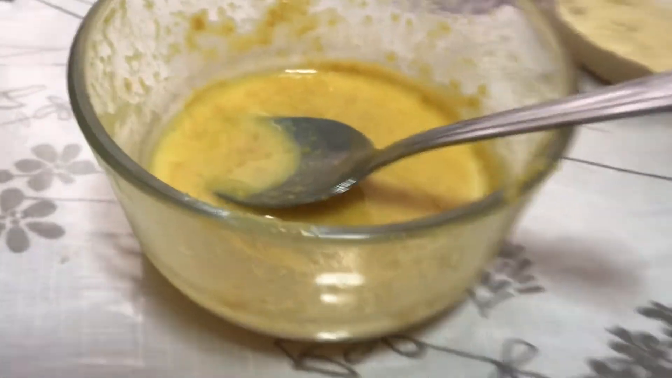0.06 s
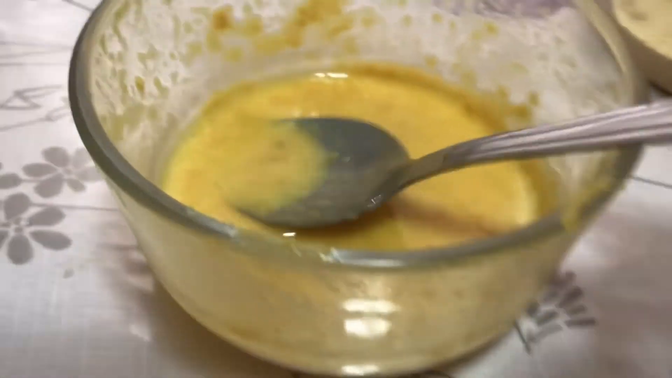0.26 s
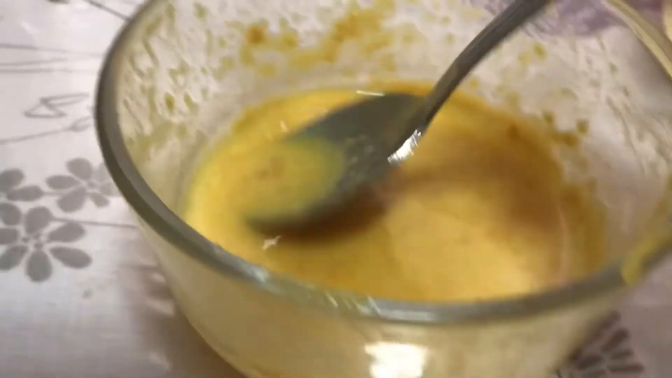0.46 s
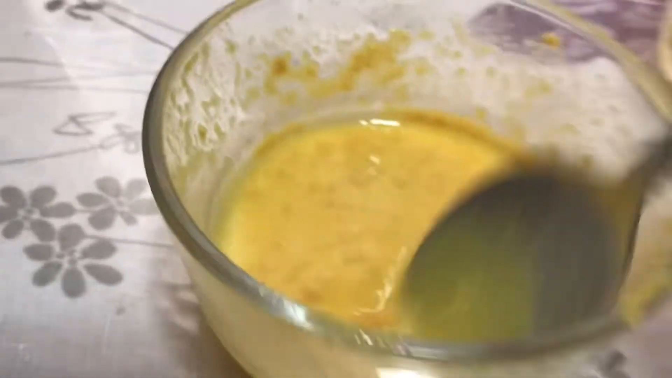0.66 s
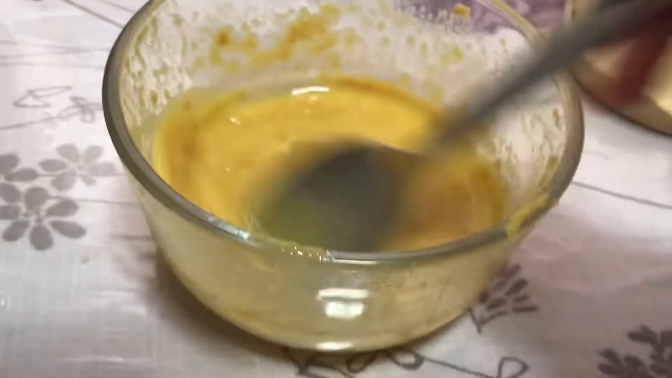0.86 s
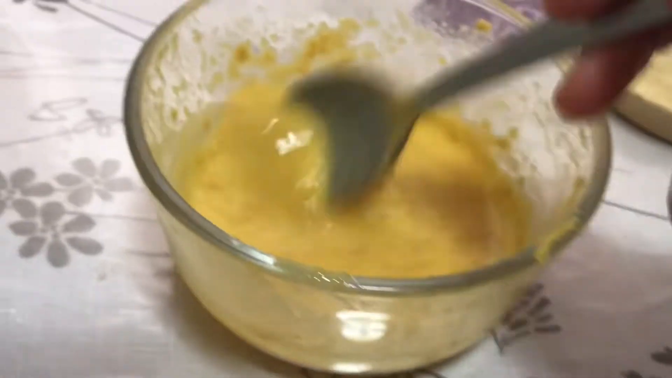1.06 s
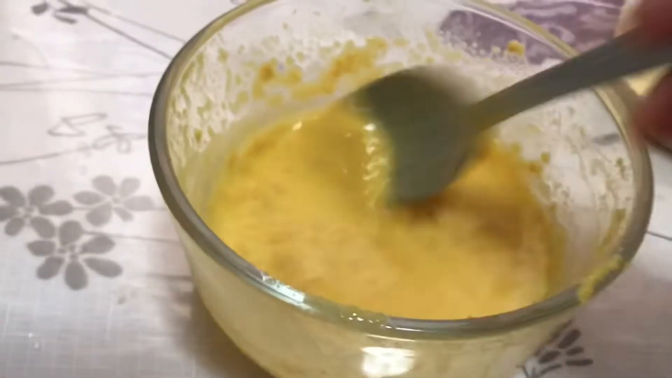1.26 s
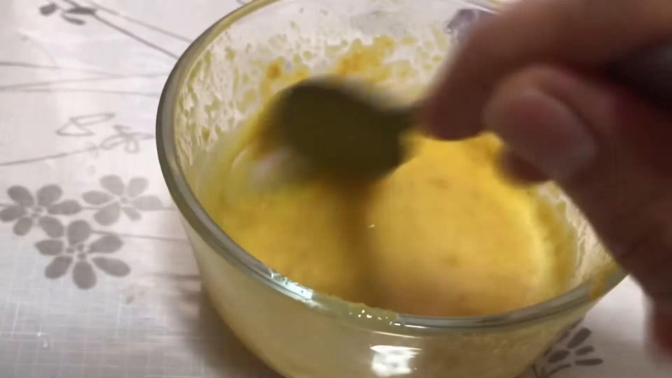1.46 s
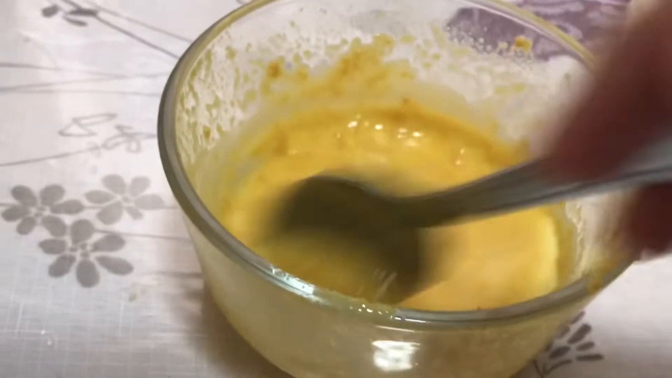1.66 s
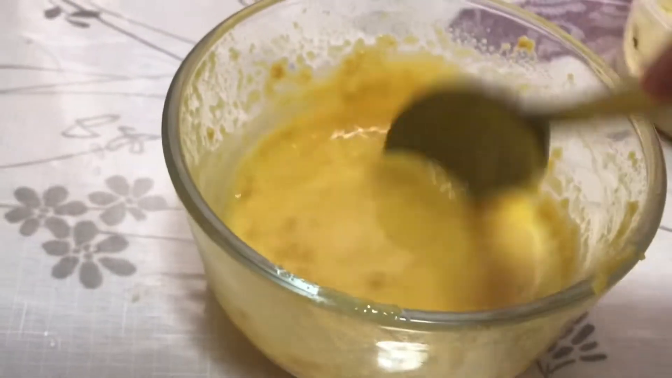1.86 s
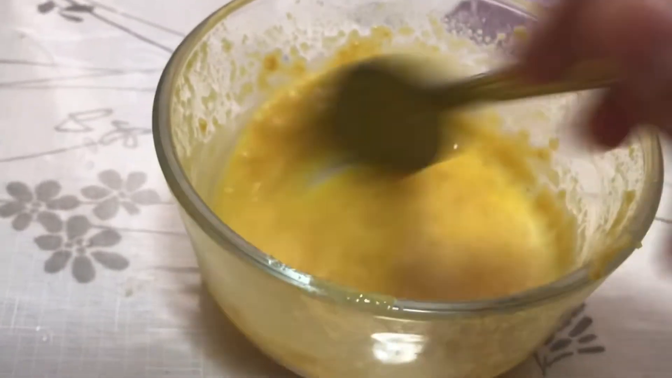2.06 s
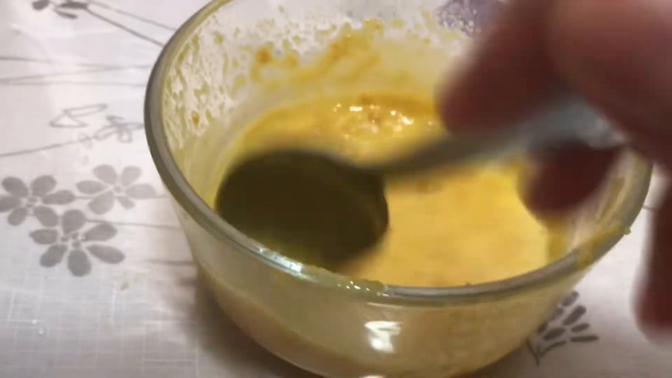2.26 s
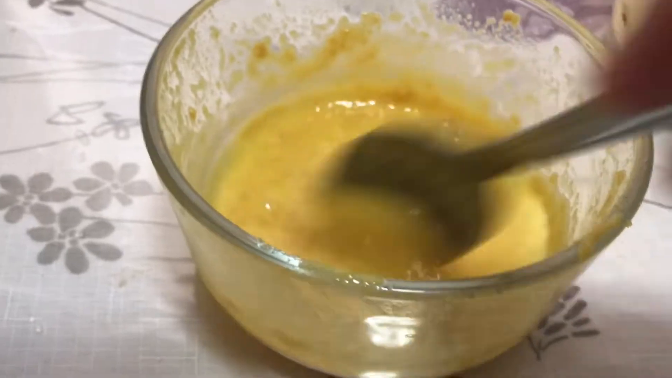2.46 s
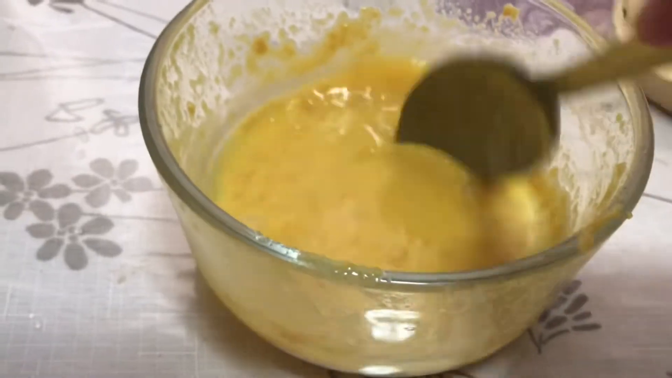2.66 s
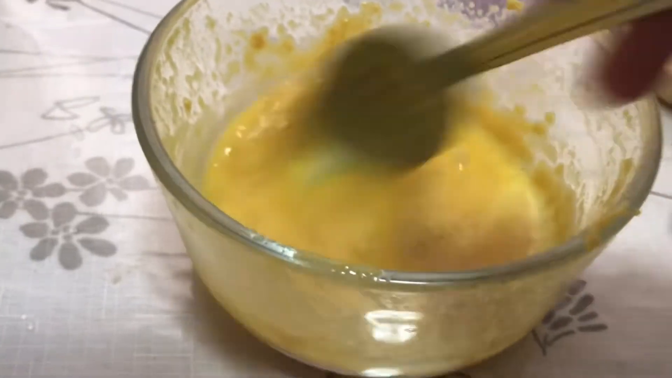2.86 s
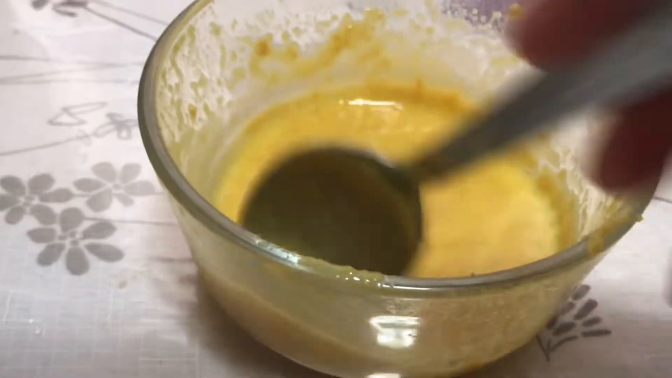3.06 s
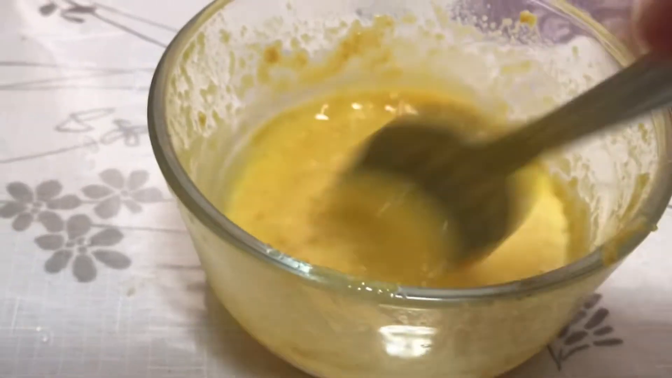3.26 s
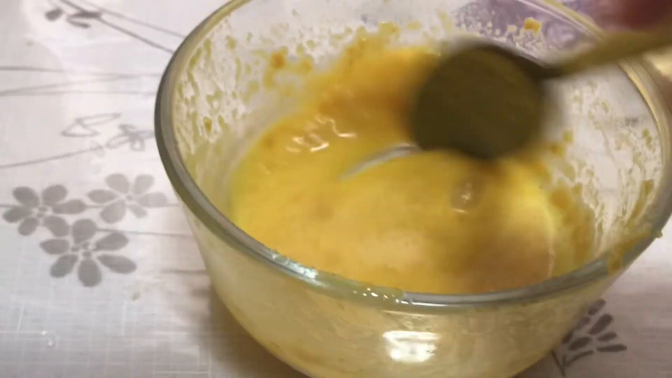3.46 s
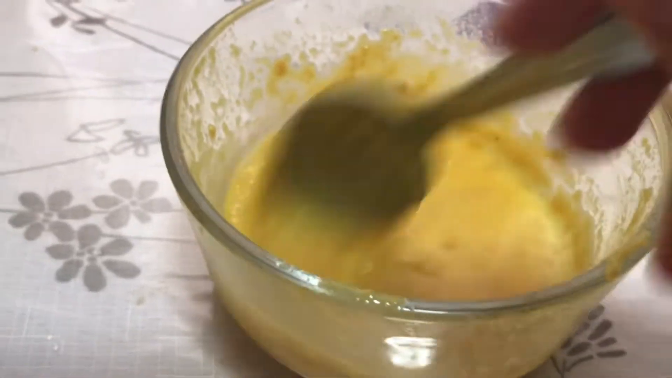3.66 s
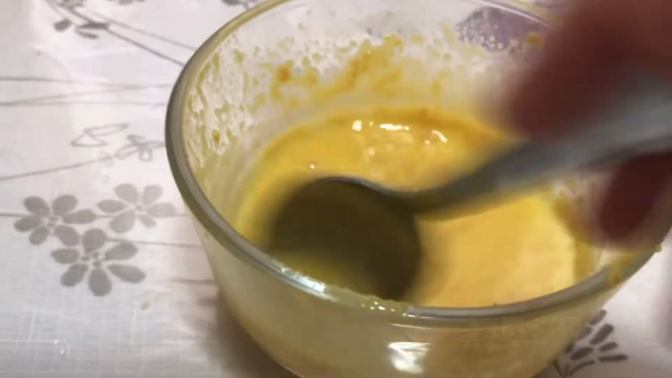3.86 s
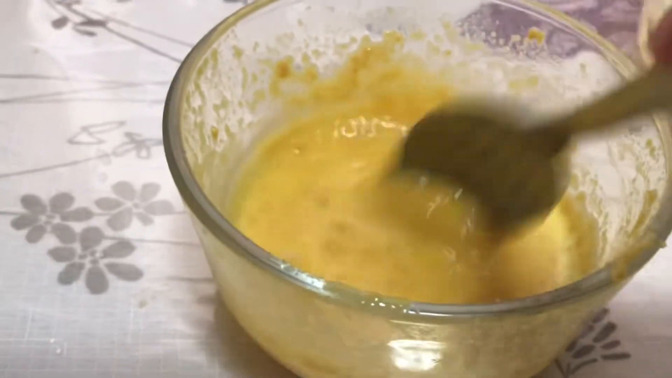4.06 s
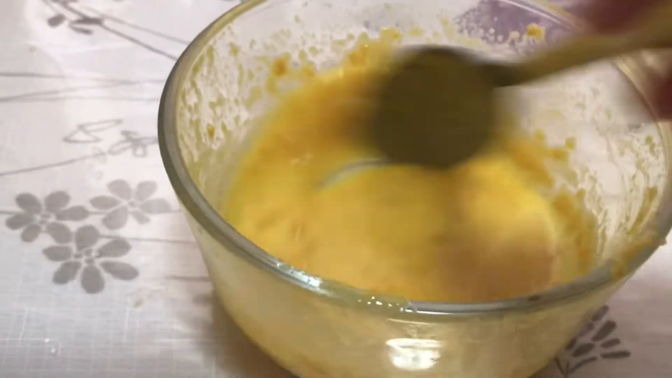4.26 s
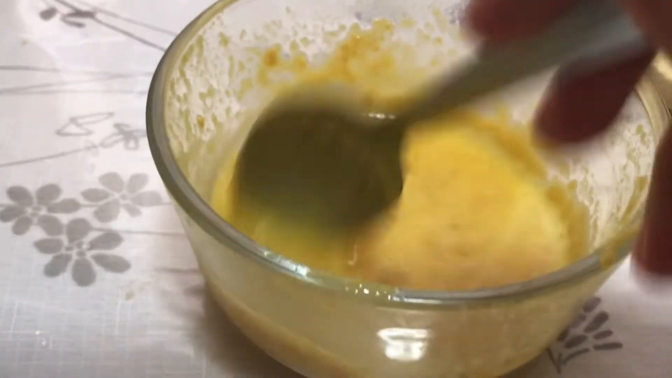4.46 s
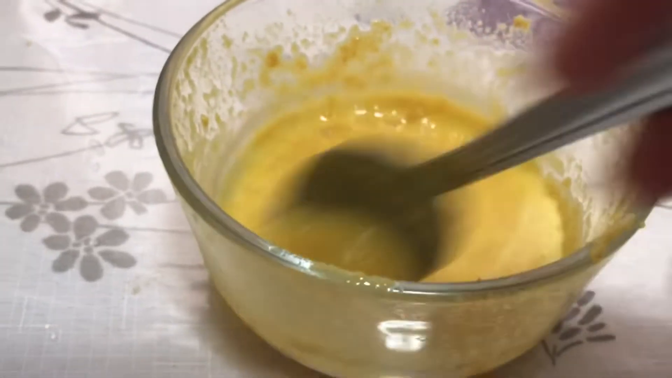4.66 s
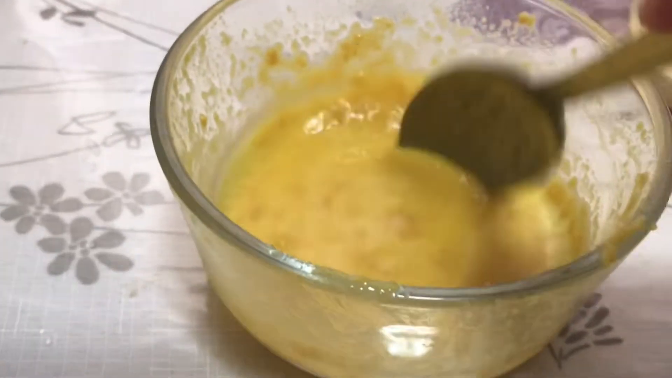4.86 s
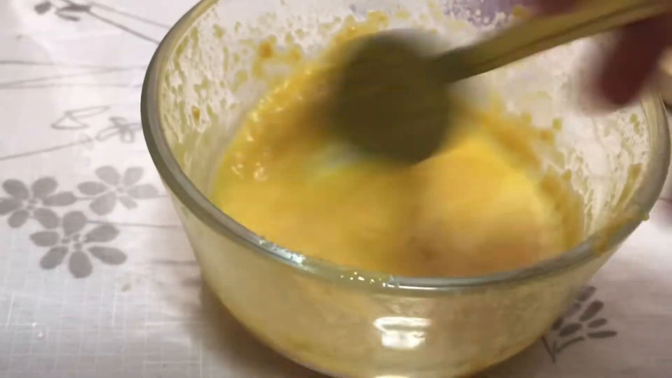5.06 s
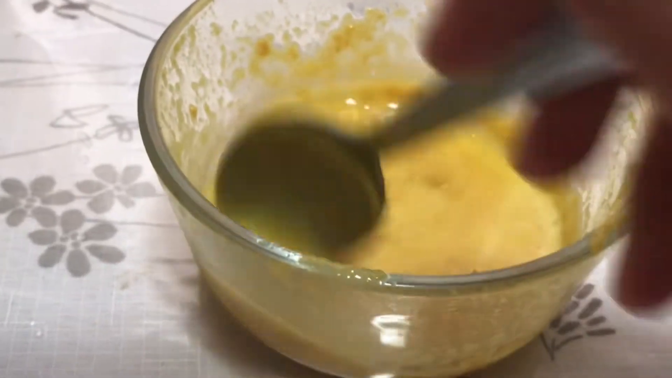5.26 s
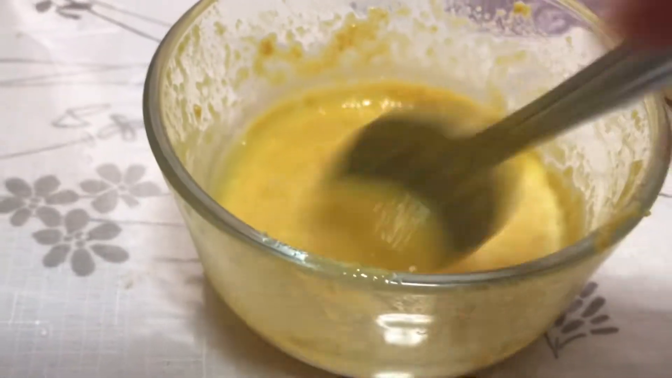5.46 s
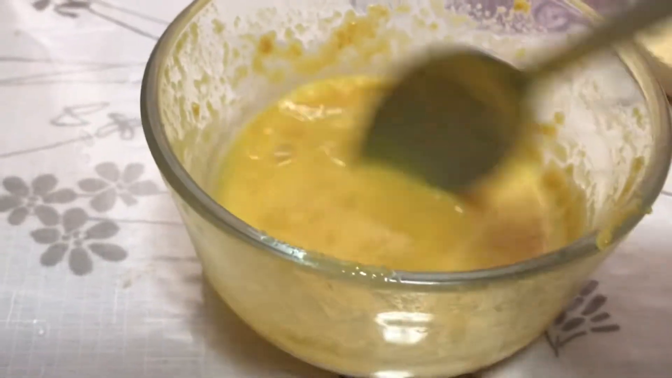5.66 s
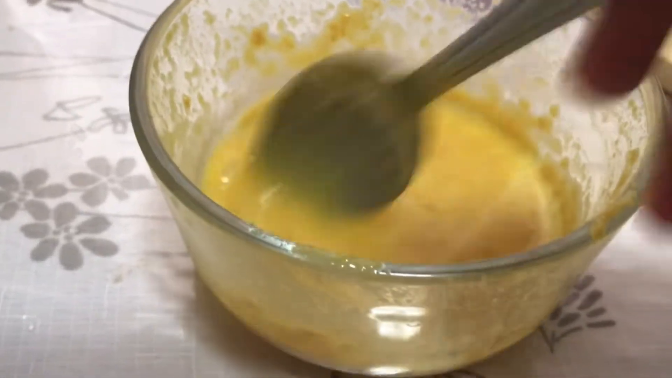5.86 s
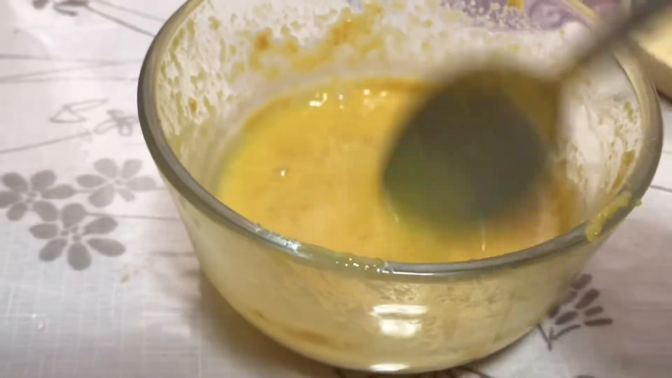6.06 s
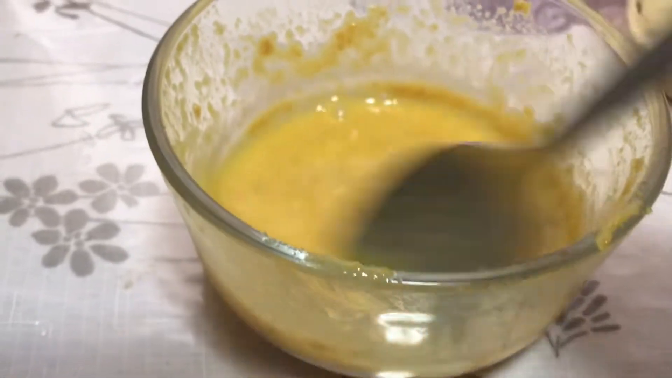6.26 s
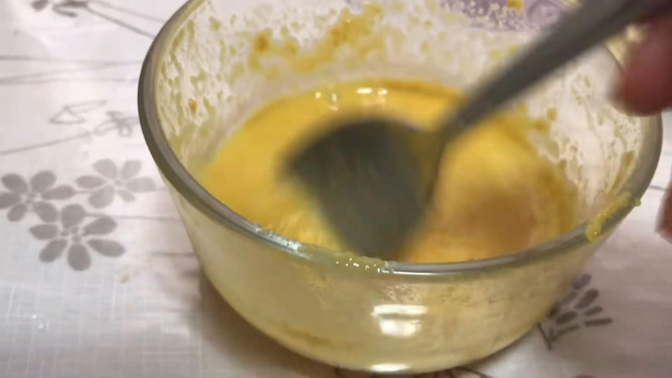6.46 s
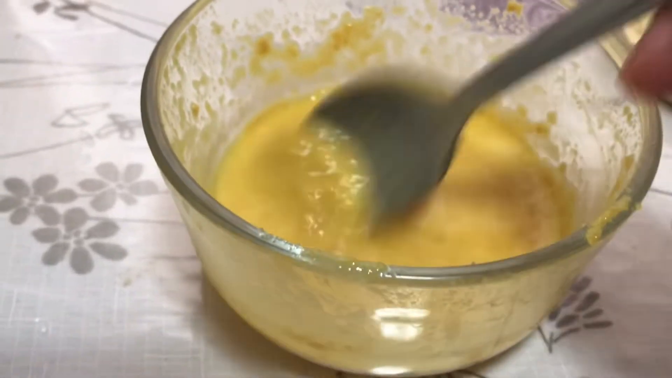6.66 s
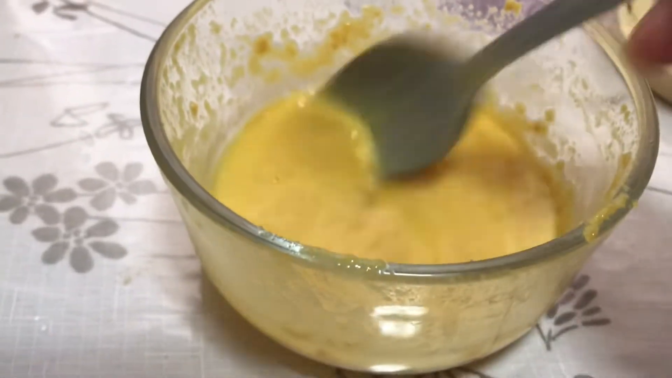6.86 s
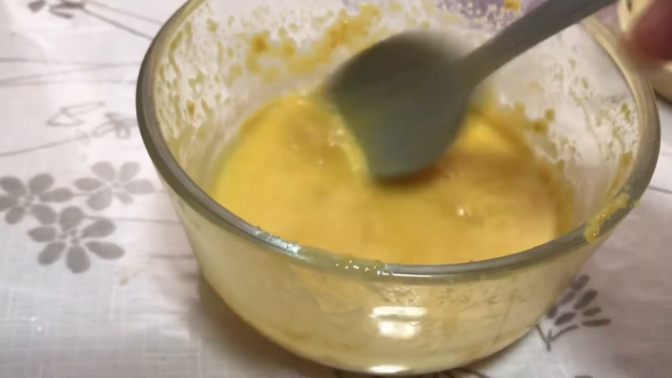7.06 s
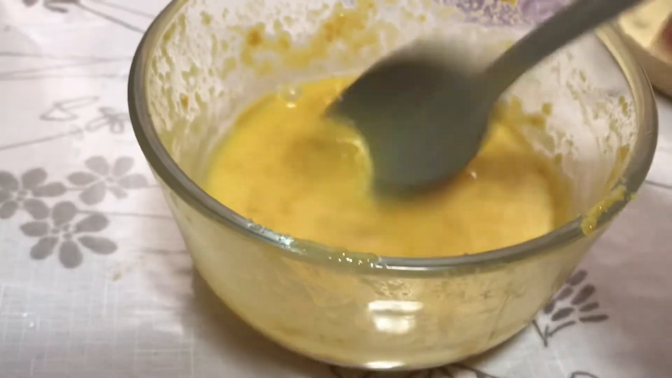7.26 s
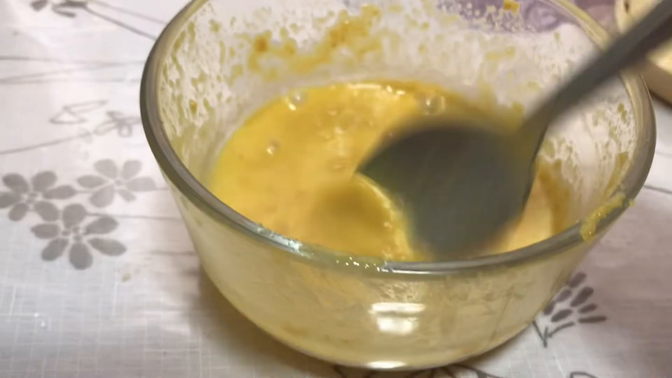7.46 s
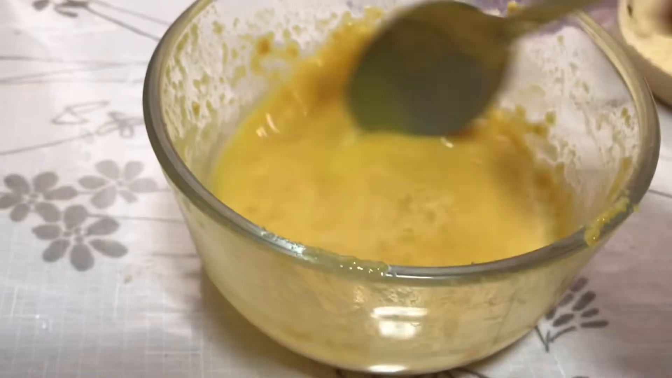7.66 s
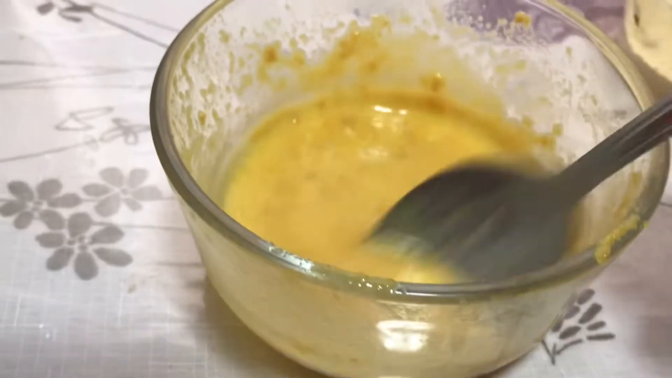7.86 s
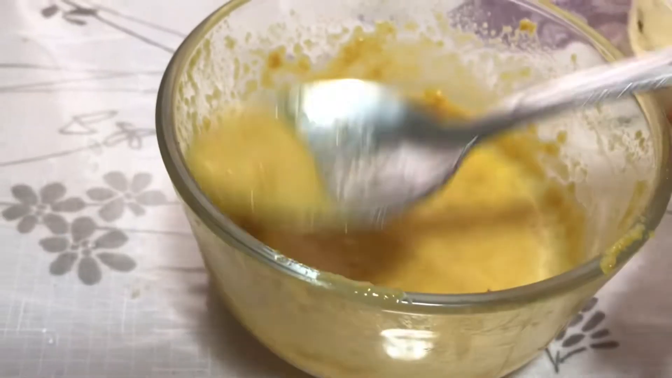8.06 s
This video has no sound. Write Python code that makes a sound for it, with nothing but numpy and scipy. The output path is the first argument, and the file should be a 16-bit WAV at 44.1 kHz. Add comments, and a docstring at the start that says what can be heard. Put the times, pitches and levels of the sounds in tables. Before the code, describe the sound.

Close up, a steel spoon clatters against a glass bowl, then scrapes round and round through wet paste with quick knocks and soft plops.

```python
"""A breath of low room rumble, then a steel spoon stirs wet paste fast in a small glass bowl, close up.
The edge grates over the glass as clumped noise driving resonances that swell and bend with each stroke.
It knocks the wall in short rattles of noise, ticks brightly and now and then rings the free rim in sines.
Paste pockets pop as gliding sines with a noisy slop; the cloth-covered table thuds in low resonances.
Faint hiss and a short kitchen reverb lie behind."""
import sys
import numpy as np
from scipy import signal
from scipy.fft import rfft, irfft, next_fast_len
from scipy.io import wavfile
from scipy.ndimage import map_coordinates

SR = 44100
rng = np.random.default_rng(int(sys.argv[2]) if len(sys.argv) > 2 else 0)


def bounce(signal):
    """Save signal as a 16-bit WAV file at the path given by the first command-line argument."""
    frames = np.transpose(np.atleast_2d(signal))
    limited = np.clip(frames, -1, 1)
    pcm = np.round(limited * 32767).astype(np.int16)
    wavfile.write(sys.argv[1], SR, pcm)


N = 357764  # length in samples


def amp(db):
    """Gain from dB."""
    return 10 ** (np.asarray(db) / 20)


def unit(x):
    """x at an RMS of 1."""
    return x / np.sqrt(np.mean(x ** 2) + 1e-20)


def along(points, hz):
    """Values of (f/Hz, value) points, joined on a log frequency axis."""
    f, values = np.transpose(points)
    return np.interp(np.log(hz + 1), np.log(f + 1), values)


def filtered(x, response):
    """x times a complex response of frequency."""
    size = next_fast_len(len(x) + 4096)
    return irfft(rfft(x, size) * response(np.fft.rfftfreq(size, 1 / SR)), size)[:len(x)]


def resonance(f, centre, width):
    """Response of one damped mode, 1 at its centre."""
    return 1j * f * width / (centre ** 2 - f ** 2 + 1j * f * width)


def resonant(x, modes, detune=1, damping=1):
    """x through modes with steep skirts; detune scales their pitches, damping their widths."""
    shifts = np.broadcast_to(detune, len(modes))

    def response(f):
        total = 0
        for (centre, width, db), shift in zip(modes, shifts):
            narrow = resonance(f, centre * shift, width * damping)
            wide = resonance(f, centre * shift, 4 * width * damping)
            total = total + amp(db) * narrow * wide
        return total

    return filtered(x, response)


def wobble(rate, size=N):
    """A smooth random curve, rate knots a second."""
    knots = rng.standard_normal(int(size * rate / SR) + 4)
    return map_coordinates(knots, [np.arange(size) * rate / SR])


def add(out, s, sound):
    """Mix a sound in at a time in seconds."""
    part = out[round(s * SR):][:len(sound)]
    part += sound[:len(part)]


# where the spoon works: t/s, wall modes over pressure at the usual pressure level/dB,
# grit over pressure level/dB, depth (0 up on the bare wall, 1 deep in the paste)
SPOON_PLACE = [(0.201, 37, 15, 0.17), (.5, 23.5, 5, 0.25), (.6, 2, 5, 0.14), (.8, -22, -4, 0.16),
               (0.999, -9.5, -4, 0.43), (1.3, 7, 1.5, 0.49), (1.5, -19, -4, 0.88), (5.3, -15, -7.5, 0.93),
               (5.6, -1.5, 3, 0.61), (5.901, 5, -1.5, 0.3), (6.3, 3, 3, 0.054), (7.1, -1, 5, 0.12),
               (7.899, 3.5, 1.5, 0.31)]


def place(s):
    """The spoon's path through the bowl: wall level, grit level and depth at a time."""
    times, *columns = np.transpose(SPOON_PLACE)
    return [np.interp(s, times, column) for column in columns]


# strokes of the edge over the glass, each until the next: start t/s, pressure level/dB, bite level/dB
EDGE_STROKES = [(0.198, -71, -10), (0.275, -62.5, -13), (0.391, -62.5, -13), (0.436, -58.5, -4),
                (0.561, -37.5, -15.5), (0.678, -45, -3), (0.784, -42.5, -12), (0.847, -44.5, -2.5),
                (0.993, -42, -19), (1.075, -42, 0.5), (1.136, -49.5, 4), (1.222, -45.5, -17),
                (1.289, -47.5, -16), (1.439, -34, -6.5), (1.648, -35.5, -11.5), (1.738, -34, -3),
                (1.914, -39.5, -8), (2.014, -33, -5), (2.189, -36, -7.5), (2.292, -35, -6.5),
                (2.44, -33.5, -6.5), (2.561, -35, -4), (2.711, -35.5, -8), (2.829, -35.5, -1),
                (2.984, -36, -3.5), (3.105, -34, -2.5), (3.262, -37.5, -8), (3.376, -34, -4),
                (3.538, -35.5, -7.5), (3.658, -32.5, -4.5), (3.815, -39, -13), (3.917, -35, -1.5),
                (4.098, -38.5, -14.5), (4.186, -33.5, -2), (4.354, -39, -6.5), (4.47, -35, 0.5),
                (4.635, -37, -8.5), (4.743, -36, -2), (4.908, -38.5, -7), (5.018, -35.5, -1.5),
                (5.192, -38.5, -13), (5.298, -37.5, 0), (5.471, -40.5, -15), (5.574, -44.5, 6.5),
                (5.722, -46.5, -14.5), (5.924, -44, -9.5), (6.167, -42.5, -10), (6.289, -48, -7.5),
                (6.395, -43.5, -5), (6.524, -47.5, -1.5), (6.622, -49.5, -17), (6.687, -47.5, -5),
                (6.855, -40, -7), (6.96, -49.5, -2), (7.044, -41, -6), (7.148, -44.5, 4),
                (7.239, -41.5, -3), (7.324, -43.5, 2), (7.433, -47.5, -14.5), (7.502, -48.5, -6),
                (7.623, -43, -15.5), (7.82, -50.5, -40)]
# resonances, also rung by the knocks, all f/Hz, width before damping/Hz, level/dB:
# glass wall under paste, air in the bowl, spoon, upper modes of the edge
WALL_MODES = [(1250, 100, 0), (1560, 280, -10), (3200, 170, -7)]
AIR_MODES = [(2240, 240, 0)]
SPOON_MODES = [(3000, 260, -4), (3930, 170, 2), (4600, 240, -4), (5400, 240, -5)]
EDGE_MODES = [(5910, 1100, 4), (6785, 1860, 8), (9010, 1730, 6), (11550, 2000, 5), (16000, 470, -48)]
LIFT_S = 7.96  # the last stroke ends
USUAL_DB, WALL_GROWS = -46, 1  # wall modes gain this many extra dB per dB of pressure over the usual
GRIT_BITE, DEEP_WALL_BITE = .55, .36  # share of the bite heard in the grit; in the wall at full depth
HARD_DB = -7  # more bite than this, deep in the paste, marks a hard push
FASTEST_PUSH, FASTEST_RETURN = .5, .47  # where in the stroke the spoon is fastest
TURN_SPEED = .22  # least speed in the level curve, share of the fastest
DEEP_WALL_RISE, DEEP_AIR_RISE = .13, .01  # pitch rise at full depth: lowest wall mode; air unless pushed
# each path: modes, swell power, pitch glide on the bare wall, glide deep in the paste
SCRAPE_PATHS = [(WALL_MODES, 1.3, .06, .06), (AIR_MODES, 1.9, .14, .27),
                (SPOON_MODES, 2.4, .12, .24), (EDGE_MODES, 2.4, .04, .08)]


def scrape():
    """Clumped stick-slip grit drives the bowl's resonances; each stroke swells, fades and bends them."""
    out = np.zeros(N)
    shared_db = 2 * wobble(110) + 4 * wobble(800)
    clumps = [amp(shared_db + 3.8 * wobble(40) + 3 * wobble(150)) for _ in SCRAPE_PATHS]
    # single grains catching under the edge, about 300 a second
    snags = [9 * (rng.random(N) < 300 / SR) * rng.standard_normal(N) for _ in SCRAPE_PATHS]
    ends = [row[0] for row in EDGE_STROKES[1:]] + [LIFT_S]
    for (s, pressure_db, bite_db), end in zip(EDGE_STROKES, ends):
        wall_db, grit_db, depth = place((s + end) / 2)
        wall_db = wall_db + WALL_GROWS * (pressure_db - USUAL_DB) + DEEP_WALL_BITE * depth * bite_db
        grit_db = grit_db + GRIT_BITE * bite_db
        levels_db = pressure_db + np.array([wall_db, 0, bite_db, grit_db])

        first, last = round((s - .015) * SR), round((end + .01268) * SR)  # strokes overlap at the turns
        u = np.linspace(0, 1, last - first)  # progress through the stroke
        hard = bite_db > HARD_DB and depth > .5
        fastest = FASTEST_PUSH if hard else FASTEST_RETURN
        warp = np.log(.5) / np.log(np.clip(fastest, .1, .9))
        speed = np.abs(np.sin(np.pi * u ** warp))
        # a hard push through paste lowers the pitches mid-stroke; any other stroke slides them upward
        bend = .598 * (.5 - speed ** 2) if hard else u - .5
        wall_pitch = 1 + DEEP_WALL_RISE * depth * np.array([1, 0, 0])
        air_pitch = 1 + DEEP_AIR_RISE * depth * (not hard)
        pitches = [wall_pitch, air_pitch, 1, 1]

        for path, clump, snag, db, pitch in zip(SCRAPE_PATHS, clumps, snags, levels_db, pitches):
            modes, swell, bare, deep = path
            grit = clump[first:last] * rng.standard_normal(len(u)) + snag[first:last]
            # each stroke meets the modes unevenly
            met = [(hz, width, level + rng.normal(0, 3)) for hz, width, level in modes]
            body = resonant(grit, met, pitch + .03 * rng.standard_normal(len(modes)))
            glide = bare + (deep - bare) * depth
            read = np.cumsum(1 + glide * (bend - bend.mean()))  # reading faster raises every pitch
            bent = unit(map_coordinates(body, [read], mode="mirror"))
            envelope = np.minimum(20 * speed, 1) * np.maximum(speed, TURN_SPEED) ** swell
            add(out, first / SR, amp(db) * envelope * bent)
    return out


# spoon against glass, damped by paste: t/s, strength level/dB,
# slant (0 square, 1 skidding), crack over strength level/dB
SPOON_KNOCKS = [(0.2827, -18, 0.95, 1.5), (0.2994, -22.5, 0.88, -6), (.411, -36, 0.69, -11),
                (0.4563, -11.5, 0.66, -1), (0.5566, -4.5, 0.76, 2), (0.598, -9.5, 0.18, -3.5),
                (0.6045, -18, 0.0086, -12.5), (0.696, -6.5, 0.71, -8), (0.8008, -13.5, 1, 9),
                (0.8605, -15.5, 0.73, -7.5), (0.8659, -3.5, 0.53, -4.5), (0.88, -25, 0.73, -1),
                (1.053, -33.5, 0.85, -3), (1.093, -22, 0.67, -11.5), (1.106, -17.5, 0.69, -9.5),
                (1.114, -21, 0.016, -2), (1.246, -27, 0.6, -12.5), (1.305, -26.5, 0.58, -17),
                (1.549, -13, 1, -13.5), (1.5842, -5, 0.04, -13.5), (1.608, -9, 0.44, -6),
                (1.81, -24, 0.9, -2), (1.818, -18.5, 0.83, -32), (1.829, -13.5, 0.72, -3.5),
                (1.8746, -12.5, 0, -8), (2.106, -10, 0.76, -19), (2.1447, -13, 0, -8.5),
                (2.1524, -12.5, 0.59, -15), (2.177, -24.5, 0.042, -14), (2.2688, -17.5, 0.21, 1.5),
                (2.377, -16.5, 0.77, -11), (2.4143, -13, 0.49, -33), (2.5401, -11, 0, -7),
                (2.64, -17, 0.75, -36), (2.691, -14, 0.061, -10.5), (2.8094, -16.5, 0.028, -4.5),
                (2.9522, -13, 0.22, 0), (3.0848, -17, 0.27, -6), (3.18, -23.5, 0.99, -2.5),
                (3.226, -15.5, 0.25, -9.5), (3.468, -14.5, 0.8, -6), (3.506, -11.5, 0.048, -7.5),
                (3.627, -17, 0, -7.5), (3.73, -16.5, 0.88, -7.5), (3.7741, -2, 0, -34),
                (3.796, -17, 0.42, -8.5), (4.005, -20, 0.77, -8.5), (4.043, -12.5, 0.55, -7.5),
                (4.0504, -11.5, 0.62, -14.5), (4.2712, -13.5, 0.97, -1.5), (4.3156, -16.5, 0.0044, -11),
                (4.5202, -24, 0.34, 5.5), (4.548, -15, 0.84, -10), (4.597, -12.5, 0, -8.5),
                (4.8292, -15.5, 0.85, -10), (4.8791, -7.5, 0, -5), (5.1556, -10, 0.032, -10.5),
                (5.103, -24, 0.87, -14.5), (5.208, -26, 0.4, -14), (5.3733, -19.5, 0.97, -7.5),
                (5.421, -10.5, 0.14, -6), (5.675, -34.5, 0.59, 5), (6.075, -14.5, 0.89, -0.5),
                (6.0912, -22.5, 0.35, -23), (6.266, -29.5, 0, -21), (6.7086, -10, 0.35, -6),
                (6.74, -20, 0.19, -5), (6.895, -25.5, 0.45, -9), (7.093, -28, 0.57, -15),
                (7.155, -13, 0.39, -14), (7.183, -20.5, 0.88, 6), (7.1907, -33, 0.94, -6),
                (7.237, -38, 0.48, -4), (7.29, -25.5, 0.54, -2), (7.352, -15.5, 0.67, -3),
                (7.413, -41, 0.95, 1), (7.5282, -25, 0.96, 3), (7.5397, -6, 0, -1), (7.556, -17, 0.78, -1),
                (7.705, -30.5, .4, -15), (7.8401, -20.5, 0.52, -20), (7.907, -31, 0.097, -20)]
KNOCK_SPOON_DB, KNOCK_SPOON_SLANT_DB = -19.5, 26  # spoon over strength, square; what a full skid adds
KNOCK_WALL_DB, KNOCK_WALL_GROWS = -3, .82  # wall at strength 0 before slant and place; dB per dB
KNOCK_WALL_SLANT_DB = -3.5  # wall change for a full skid
KNOCK_WALL_PLACE = .27  # share of the place's wall level heard in a knock
CRACK_DB = 7.5  # edge modes over strength for a crack of 0 dB
SKID_BUILD_S = .02  # a full skid swells 60 dB over about this time before its peak


def knocks():
    """Each contact is a short rattle of force into the damped modes of wall, air, spoon and edge."""
    out, lead = np.zeros(N), SR // 100
    t = (np.arange(SR // 16) - lead) / SR
    for s, db, slant, crack_db in SPOON_KNOCKS:
        place_wall_db, _, depth = place(s)
        spoon_db = db + KNOCK_SPOON_DB + KNOCK_SPOON_SLANT_DB * slant
        wall_db = KNOCK_WALL_DB + KNOCK_WALL_GROWS * db + KNOCK_WALL_SLANT_DB * slant
        wall_db = wall_db + KNOCK_WALL_PLACE * place_wall_db
        # near 1 where the spoon outweighs the air and the crack
        glancing = 1 / (1 + amp(max(db - 3, db + crack_db + 7) - spoon_db) ** 4)
        build_s = .0003 + SKID_BUILD_S * glancing ** 2  # a skid builds and lasts longer
        fade_s = .013 + .013 * glancing
        force = amp(60 * np.minimum(t / build_s, -t / fade_s)) * rng.standard_normal(len(t))
        force[lead] += 7 * (1 - glancing)
        paths = [(AIR_MODES, db, .73 + .97 * depth), (WALL_MODES, wall_db, 2.2),
                 (SPOON_MODES, spoon_db, 1.1), (EDGE_MODES, db + crack_db + CRACK_DB, 1.2)]
        for modes, level_db, damping in paths:
            detune = 1 + .024 * rng.standard_normal(len(modes))
            ring = resonant(force, modes, detune, damping)
            add(out, s - lead / SR, amp(level_db) * ring / np.abs(ring).max())
    return out


# air pockets between spoon and paste snapping shut: t/s, level before the attack/dB, settled f/Hz
POCKET_POPS = [(1.587, -9, 620), (1.874, -11.5, 538), (2.147, -14, 528), (2.269, -10.5, 1025),
               (2.414, -1, 990), (2.54, -11.5, 847), (2.69, -6.5, 885), (2.953, -6, 875),
               (3.085, -15.5, 688), (3.226, -19.5, 924), (3.505, -9, 583), (3.628, -10, 964),
               (3.773, -17, 563), (4.043, -11, 580), (4.317, -13.5, 596), (4.597, -7.5, 836),
               (4.878, -8.5, 750), (5.156, -8.5, 694), (5.421, -13, 870)]
SLOP_DB, SLOP_S = -19.5, .17  # paste settling: peak over the pop's level, t60 of its force


def pops():
    """A pocket rings, settling from above; the highest ring for fewer cycles and die sooner; paste slops."""
    out, t = np.zeros(N), np.arange(SR // 8) / SR
    for s, db, hz in POCKET_POPS:
        turns = hz * (t + .00036 * (1 - np.exp(-t / .0012)))  # starts 30 % high
        cycles = 21 / (1 + (hz / 1080) ** 12)  # until 60 dB down
        slop_force = amp(-60 * t / SLOP_S) * rng.standard_normal(len(t))
        slop = resonant(slop_force, [(1.14 * hz, 450, 0)])
        add(out, s, amp(db + SLOP_DB) * slop / np.abs(slop).max())
        envelope = amp(db - 60 * t * hz / cycles) * (1 - np.exp(-t / .00032))
        add(out, s, envelope * np.sin(2 * np.pi * turns))
    return out


# blows near the rim that leave the glass ringing: t/s, first mode level/dB, second mode level/dB,
# fourth mode level/dB, other modes level/dB, share of the free ring time
RIM_CLINKS = [(0.5559, -35, -19, -19, -33, 1), (0.605, -26.5, -34.5, -39, -46, 1),
              (0.698, -29.5, -37.5, -41, -38, 0.71), (0.802, -19.5, -22.5, -15, -10, 0.74),
              (0.866, -28, -30, -29.5, -26, 0.75), (1.111, -37.5, -39.5, -37, -45, 0.52),
              (1.606, -28, -26.5, -21, -27, 0.26), (2.178, -35.5, -55, -47, -49, 0.75),
              (7.705, -37.5, -37, -21, -45, 0.13), (7.84, -52, -45, -32.5, -41.5, 0.45),
              (7.909, -52, -58, -46.5, -62, 0.5)]
# free glass modes: f/Hz, level/dB, t60 before that share/s
RIM_MODES = [(1313, 0, .6), (3155, 0, .3), (4340, -12, .1), (5512, 0, .14), (8470, -2, .09),
             (11950, -10, .08)]
FREE_S, MUTED_S = .095, .12  # time before the spoon rests on the rim; t60 of the extra fade after that
ROUGH_DB = 3.2  # scale of the uneven ringing
BEAT, SPLIT = .12, .0054  # depth of each mode's beat; beat rate over pitch
LINGER_DB, LINGER_S = -26.5, .6  # slower end of each ring: level under its start, t60 before the share


def clinks():
    """Rim modes ring unevenly, beating, until the spoon rests or strikes again; a faint tail dies slower."""
    out, t = np.zeros(N), np.arange(SR // 2) / SR
    nexts = [row[0] for row in RIM_CLINKS[1:]] + [N / SR]
    for (s, first_db, second_db, fourth_db, others_db, free), following in zip(RIM_CLINKS, nexts):
        rested_db = -60 * np.clip(t - FREE_S, 0, None) / MUTED_S
        touched_db = -60 * np.clip(t - following + s, 0, None) / .01
        strengths_db = [first_db, second_db, others_db, fourth_db, others_db, others_db]
        for db, (hz, level, t60) in zip(strengths_db, RIM_MODES):
            ring = amp(touched_db - 60 * t / (t60 * free))
            linger = amp(LINGER_DB - 60 * t / (LINGER_S * free))
            beat = 1 + BEAT * np.cos(2 * np.pi * hz * SPLIT * t)
            tone = np.sin(2 * np.pi * hz * t) * beat
            uneven_db = ROUGH_DB * wobble(78, size=len(t))
            add(out, s, amp(db + level + rested_db + uneven_db) * (ring + linger) * tone)
    return out


# thin bright ticks of the spoon edge on the glass: t/s, peak level/dB
EDGE_TICKS = [(1.1052, -6), (1.1066, -5), (1.33, -36), (1.355, -34), (4.16, -43), (4.425, -25),
              (5.0736, -17), (7.045, -35.5), (7.374, -13.5), (7.518, -30)]
# what a tick rings with: f/Hz, width/Hz, level/dB
TICK_MODES = [(9700, 1300, -2), (11600, 1500, -1), (13200, 1500, -4)]


def ticks():
    """A spit of force into high modes only."""
    out, t = np.zeros(N), np.arange(SR // 50) / SR
    for s, db in EDGE_TICKS:
        force = amp(-60 * t / .006) * rng.standard_normal(len(t))
        ring = resonant(force, TICK_MODES)
        add(out, s, amp(db) * ring / np.abs(ring).max())
    return out


# the bowl pressed on the table: t/s, push level before a fixed gain/dB
TABLE_PUSHES = [(0.282, -33.5), (0.456, -35), (0.597, -34), (0.695, -29), (0.864, -33), (1.109, -28.5),
                (1.301, -39), (1.549, -35), (1.605, -29), (2.151, -30), (1.82, -40.5), (3.504, -37.5),
                (3.774, -35), (4.044, -31.5), (5.155, -44.5), (5.66, -44.5), (6.073, -25.5), (6.708, -36.5),
                (7.09, -45.5), (7.389, -46.5), (7.537, -33)]
# low modes of the table top: f/Hz, width/Hz, level/dB
TABLE_MODES = [(65.8, 7.9, 4.5), (133.4, 8.6, 4), (203.7, 16, 2), (242, 30, -2), (317.6, 43, -0.5),
               (366, 23.7, 1.5)]


def thuds():
    """The table's low modes answer each push, a blow with a rattling tail, and the stirring itself."""
    push, t = np.zeros(N), np.arange(SR // 4) / SR
    for s, db in TABLE_PUSHES:
        rattle = .022 * amp(-60 * t / .25) * rng.standard_normal(len(t))
        rattle[0] = 1
        add(push, s, amp(db + 49.5) * rattle)
    times = np.arange(N) / SR
    busy = np.interp(times, [.25, .5, 7.7, 8], [0, 1, 1, 0])
    depth = place(times)[2]
    stirring_db = -41.5 + 7.4 * depth + 1.27 * wobble(22)
    push += busy * amp(stirring_db) * rng.standard_normal(N)
    return resonant(push, TABLE_MODES)


# the room's answer: f/Hz, t60/s
KITCHEN_DECAY = [(300, 0.58), (2000, 0.082), (10000, 0.07)]


def kitchen(x):
    """Reverb from a noise tail in which each frequency dies at its own speed."""
    hz, t, spectrum = signal.stft(rng.standard_normal(SR // 3), SR, nperseg=256)
    decay = amp(-60 * t / along(KITCHEN_DECAY, hz)[:, None])
    tail = signal.istft(spectrum * decay, SR, nperseg=256)[1]
    delayed = np.pad(x, (200, 0))  # samples
    return signal.fftconvolve(delayed, tail / np.linalg.norm(tail))[:N]


# spectrum of the still kitchen: f/Hz, relative level/dB
QUIET_SPECTRUM = [(18, -52.5), (30, -2.5), (54, -10.5), (70, -2), (122, -7), (206, -16), (248, -13.5),
                  (399, -33), (519, -32), (12300, -41), (16500, -57)]


def quiet():
    """Shaped noise: low room rumble over faint hiss, its level wavering slightly."""
    noise = filtered(rng.standard_normal(N), lambda hz: amp(along(QUIET_SPECTRUM, hz)))
    return amp(-54 + .85 * wobble(4.8)) * unit(noise)


def scene():
    """Spoon, paste, table and room; only blows and pockets feed the reverb."""
    blows = knocks() + clinks() + ticks()
    pockets = pops()
    room = amp(-15) * kitchen(blows + amp(-7.5) * pockets)
    return (blows + pockets + room + scrape() + thuds() + quiet())[None]


TOP_HZ = 16900  # band limit


def record(dry):
    """The input clips; the microphone loses deep bass and the last treble, with nothing past the limit."""
    def mic(hz):
        bass_cut = (1j * hz / (55 + 1j * hz)) ** 2
        treble_cut = amp(-18 * np.clip(hz / 1000 - 15.7, 0, None))  # 18 dB per kHz
        return bass_cut * treble_cut * (hz < TOP_HZ)

    return filtered(np.clip(dry[0], -.9, .9), mic)[None]


dry = scene()
out = record(dry)
bounce(out)
```